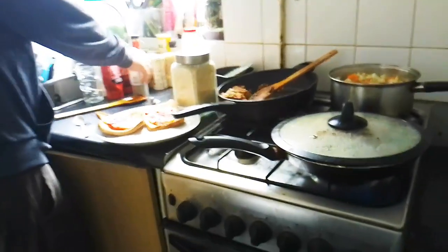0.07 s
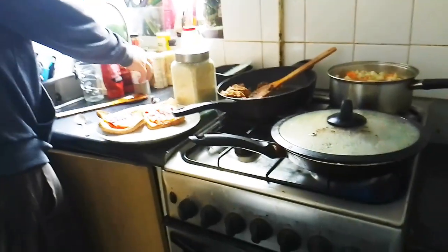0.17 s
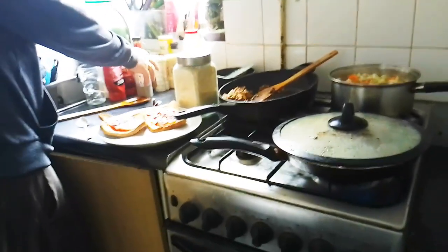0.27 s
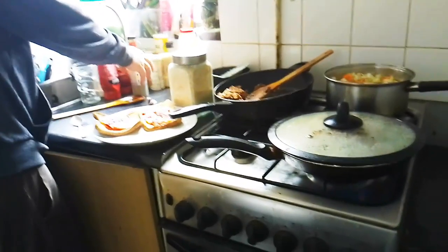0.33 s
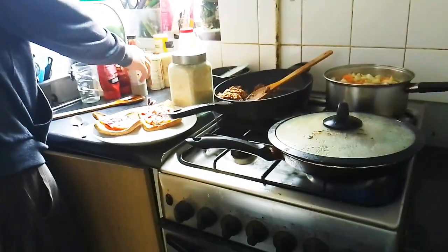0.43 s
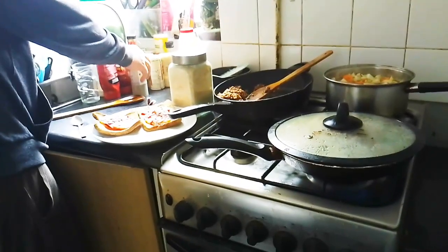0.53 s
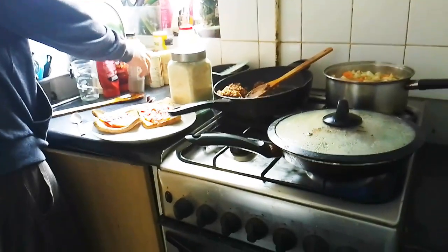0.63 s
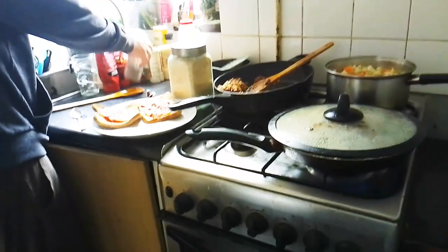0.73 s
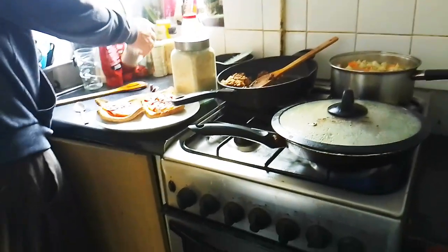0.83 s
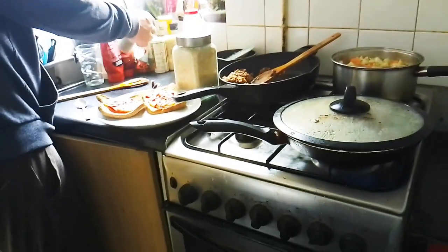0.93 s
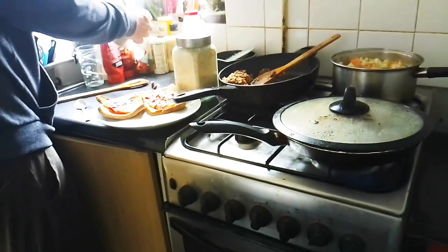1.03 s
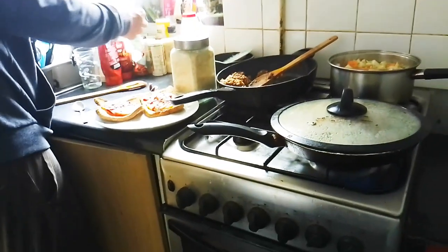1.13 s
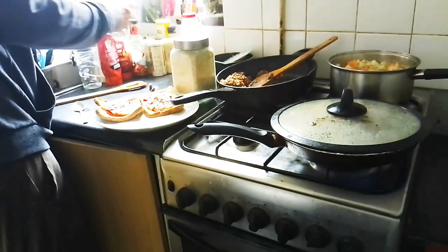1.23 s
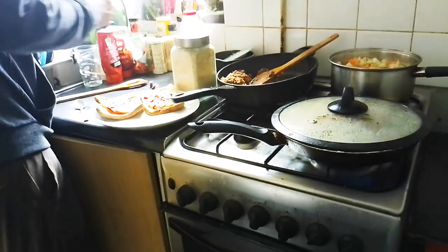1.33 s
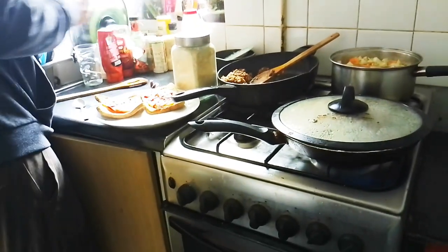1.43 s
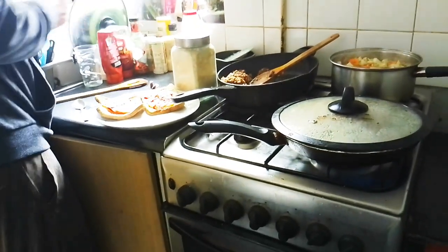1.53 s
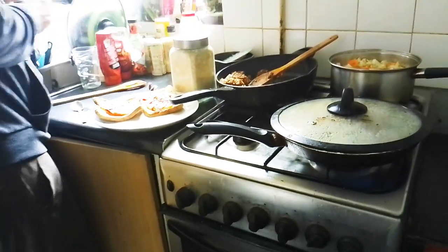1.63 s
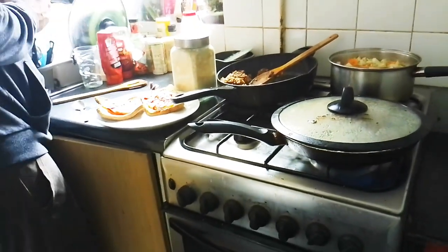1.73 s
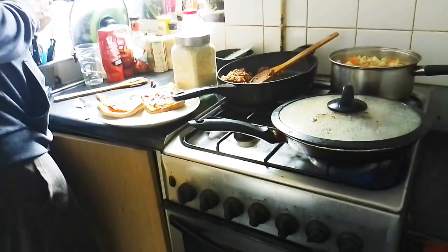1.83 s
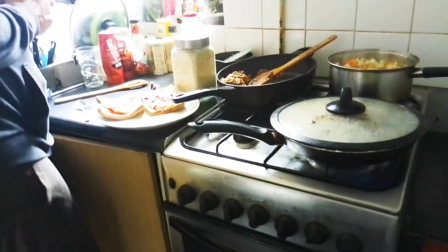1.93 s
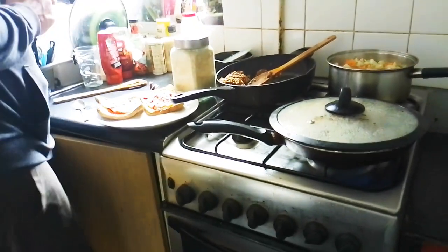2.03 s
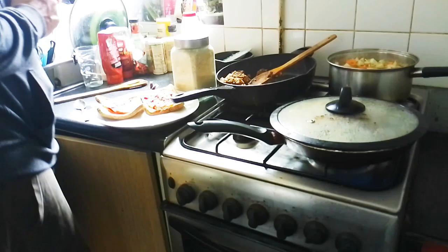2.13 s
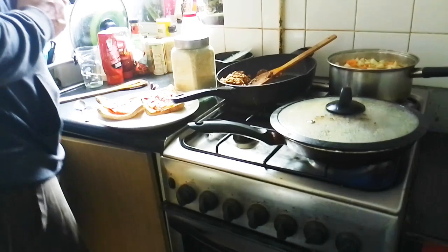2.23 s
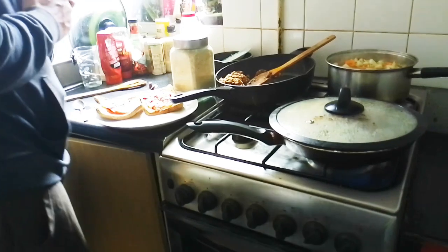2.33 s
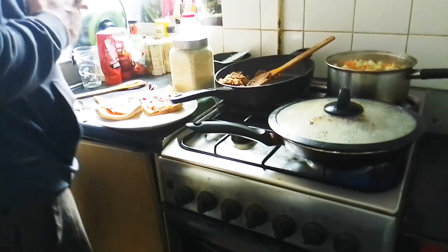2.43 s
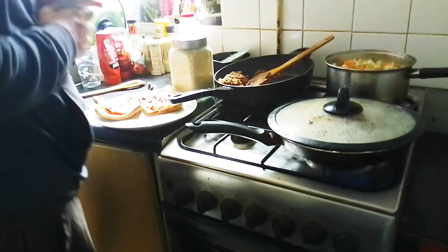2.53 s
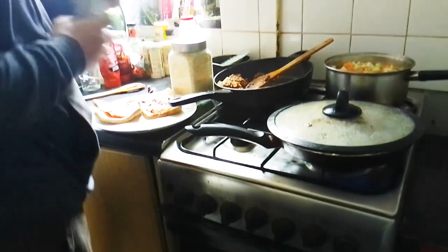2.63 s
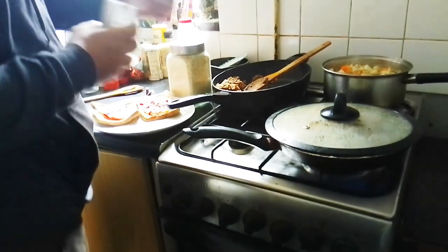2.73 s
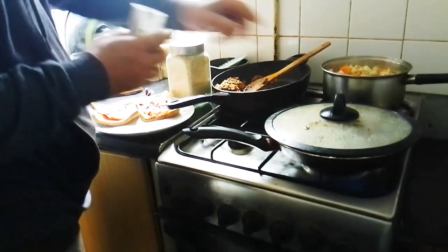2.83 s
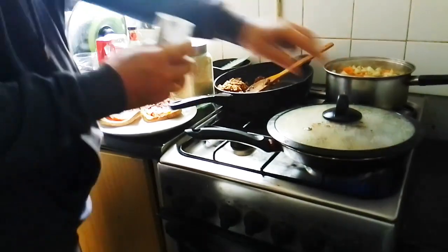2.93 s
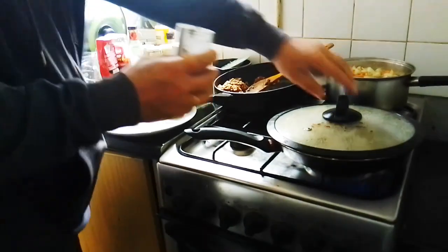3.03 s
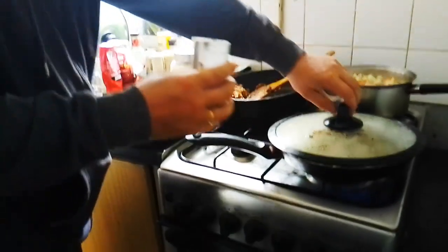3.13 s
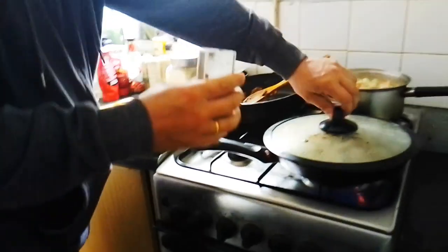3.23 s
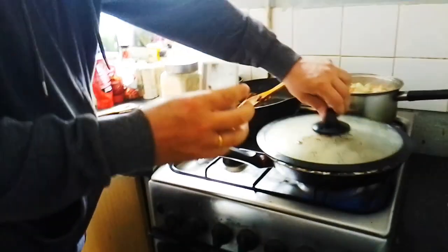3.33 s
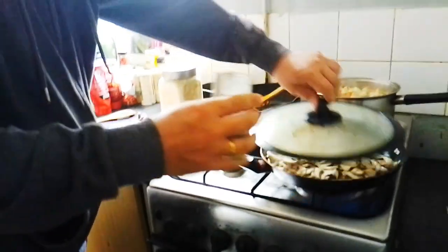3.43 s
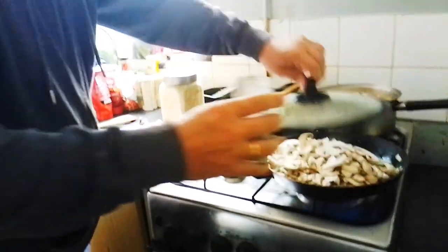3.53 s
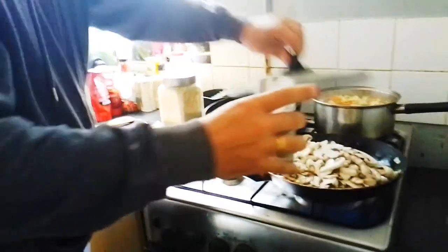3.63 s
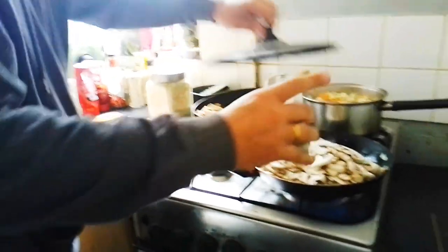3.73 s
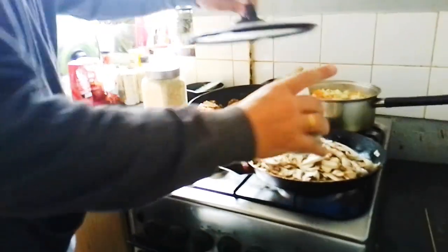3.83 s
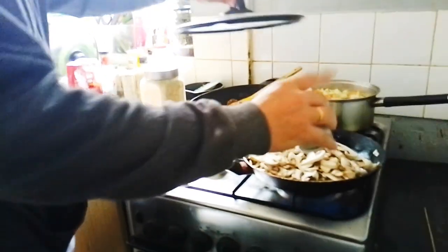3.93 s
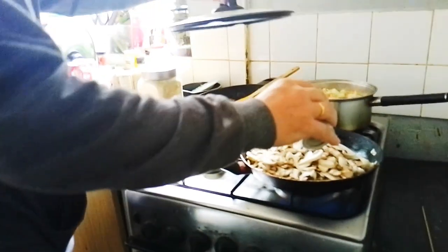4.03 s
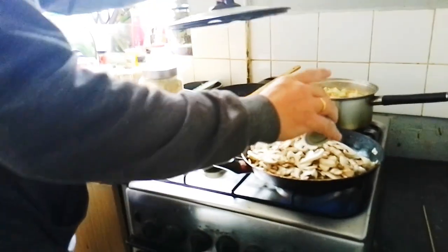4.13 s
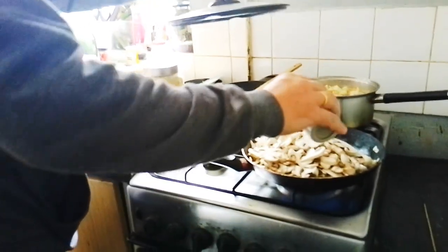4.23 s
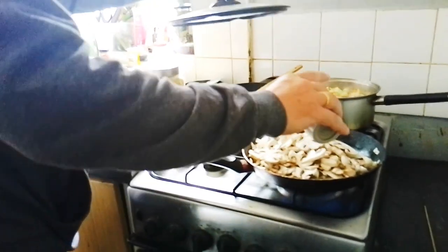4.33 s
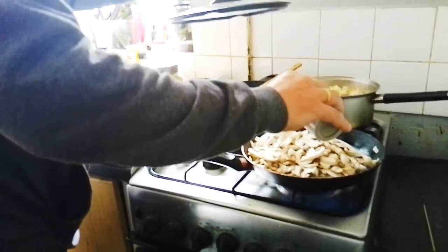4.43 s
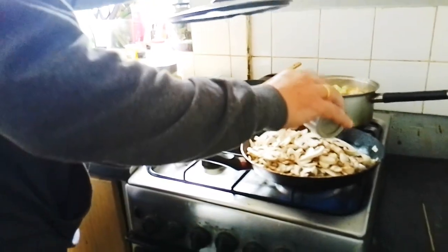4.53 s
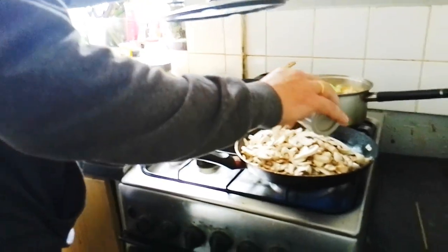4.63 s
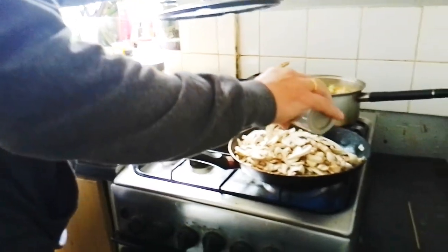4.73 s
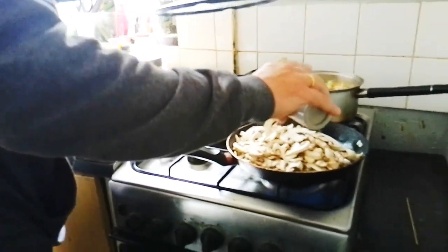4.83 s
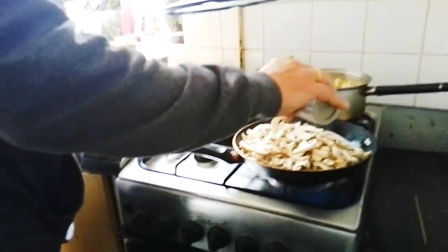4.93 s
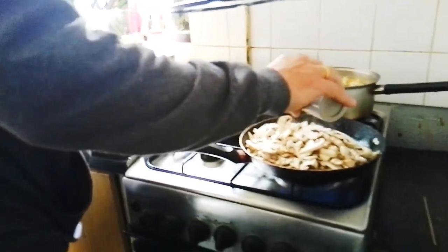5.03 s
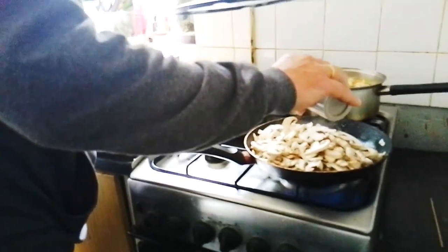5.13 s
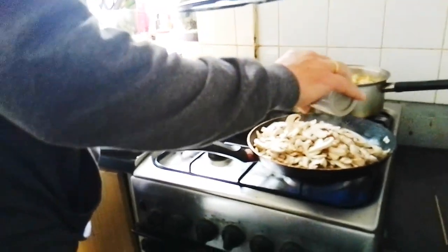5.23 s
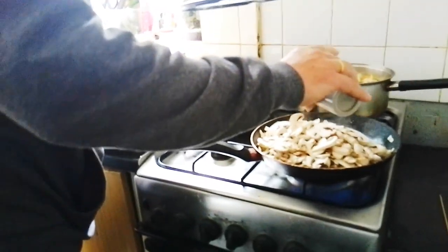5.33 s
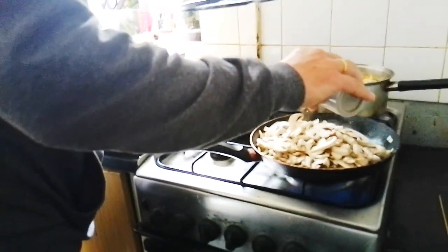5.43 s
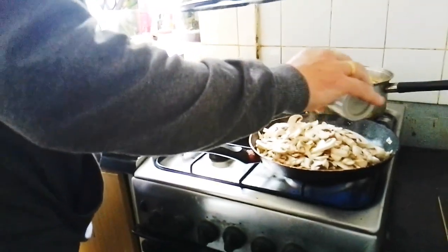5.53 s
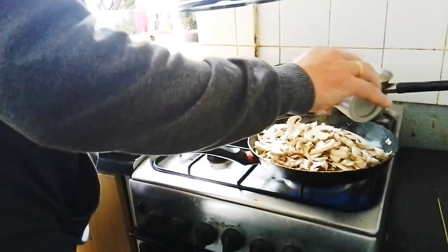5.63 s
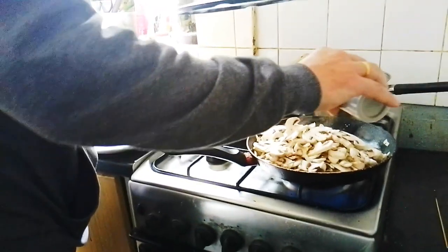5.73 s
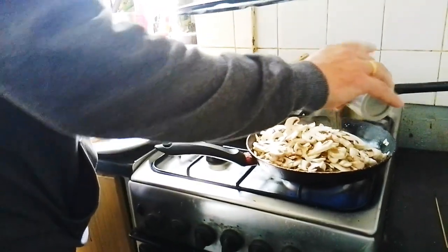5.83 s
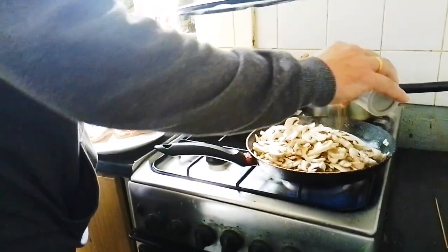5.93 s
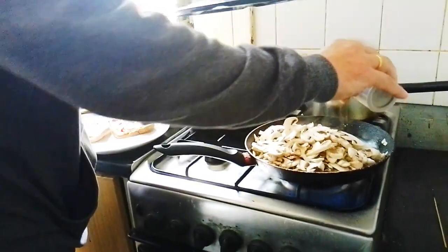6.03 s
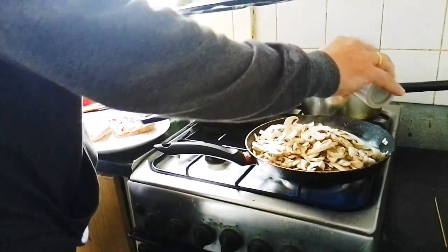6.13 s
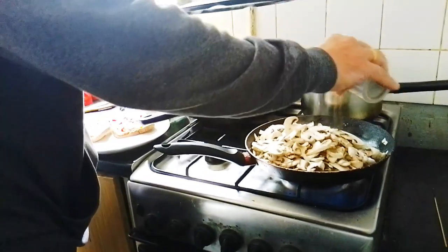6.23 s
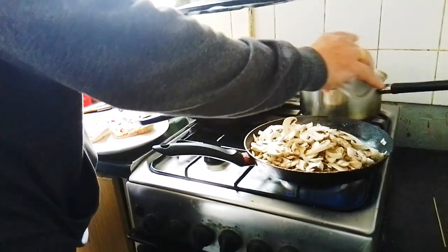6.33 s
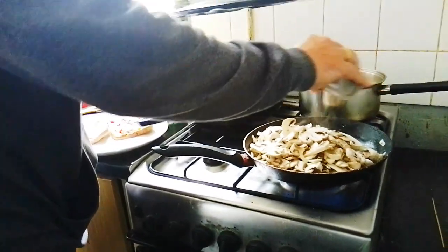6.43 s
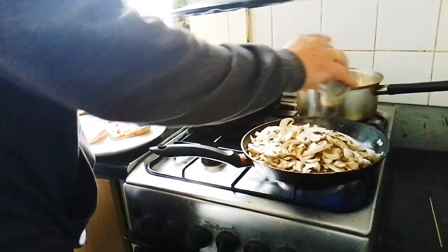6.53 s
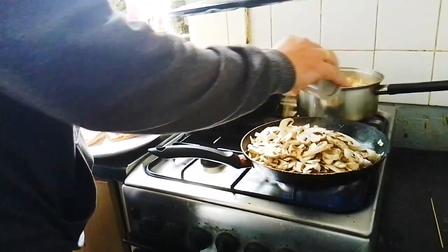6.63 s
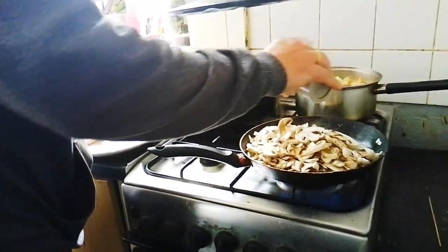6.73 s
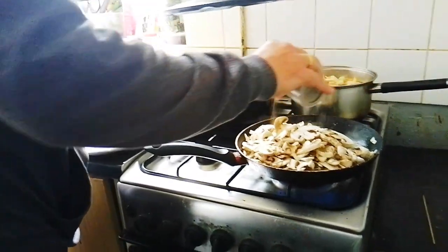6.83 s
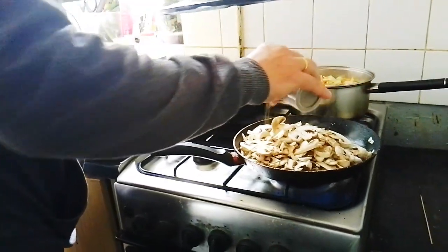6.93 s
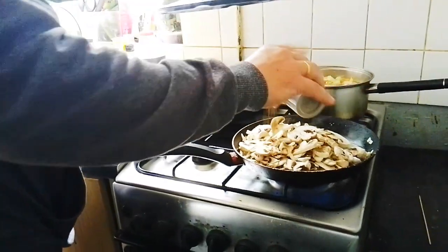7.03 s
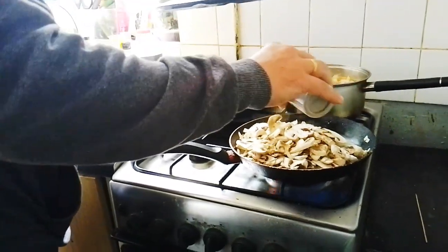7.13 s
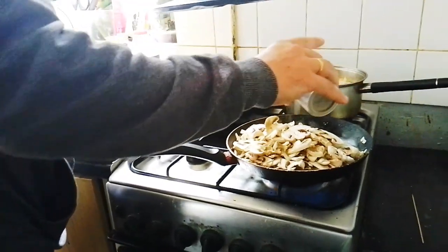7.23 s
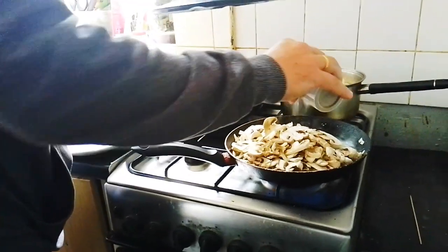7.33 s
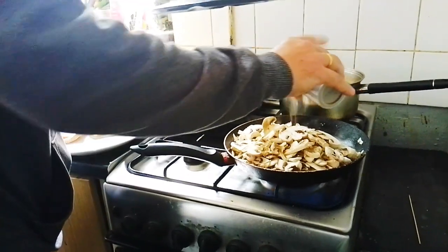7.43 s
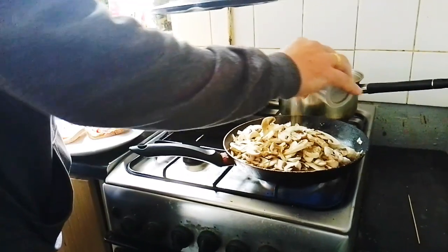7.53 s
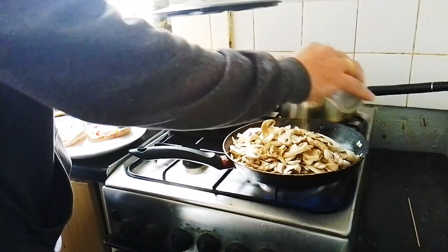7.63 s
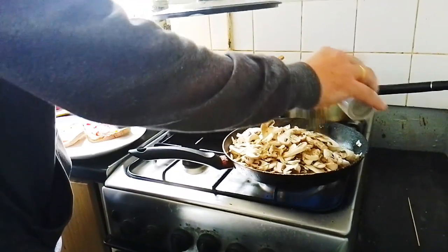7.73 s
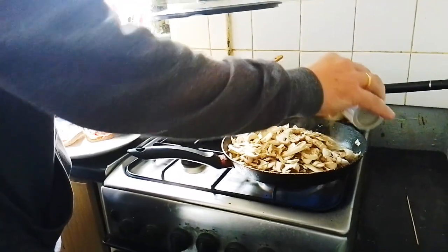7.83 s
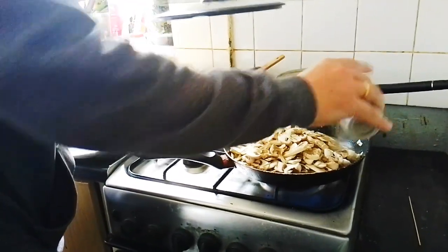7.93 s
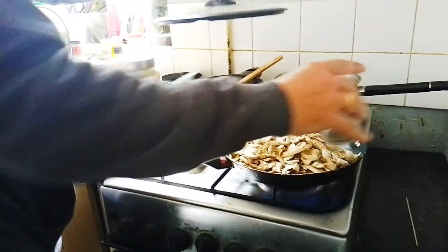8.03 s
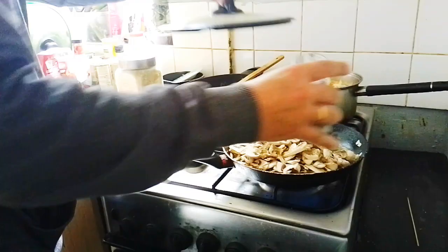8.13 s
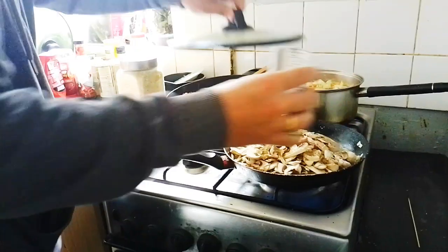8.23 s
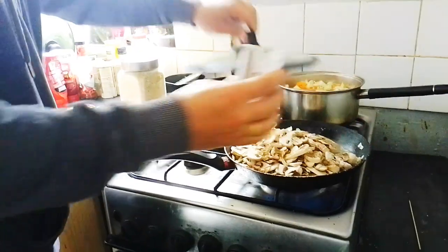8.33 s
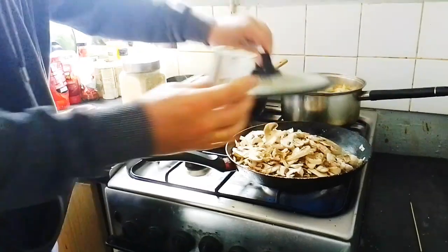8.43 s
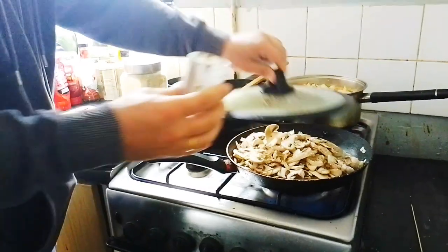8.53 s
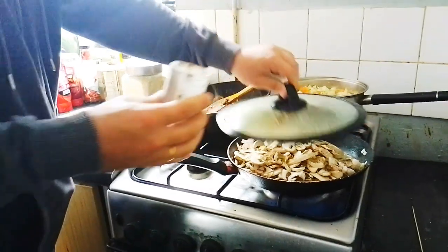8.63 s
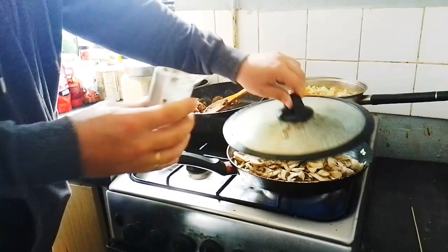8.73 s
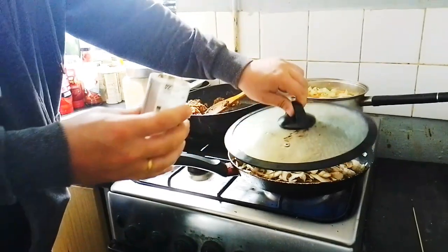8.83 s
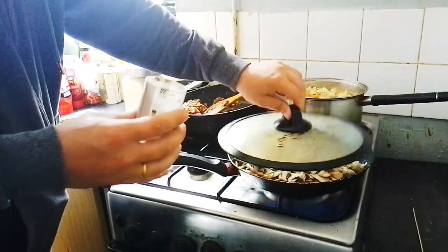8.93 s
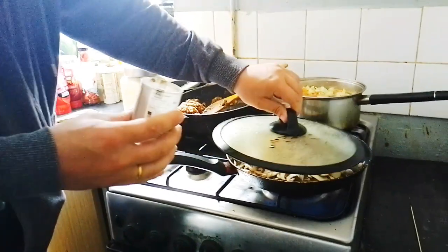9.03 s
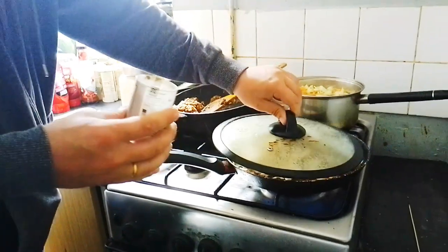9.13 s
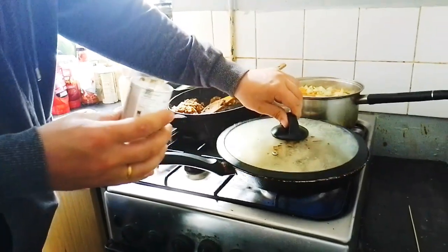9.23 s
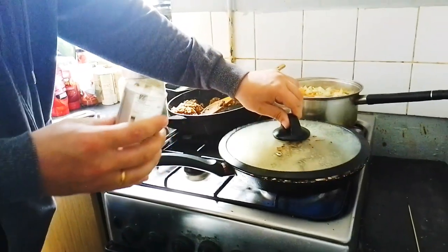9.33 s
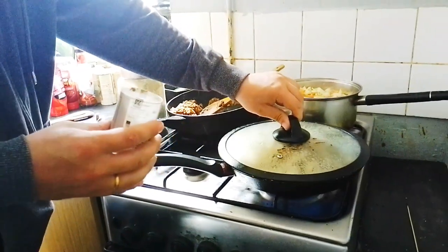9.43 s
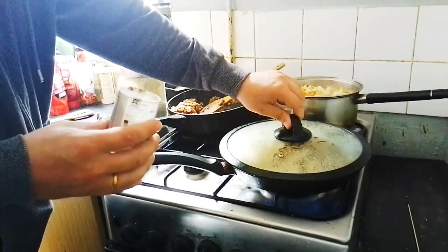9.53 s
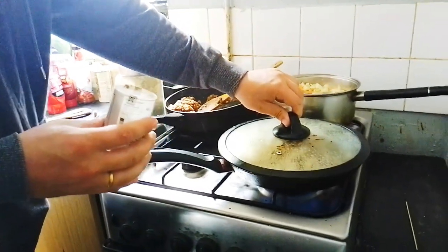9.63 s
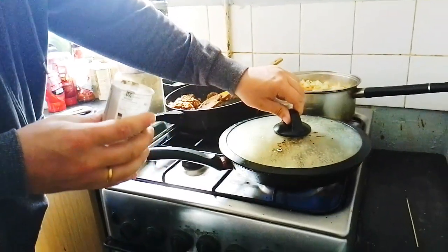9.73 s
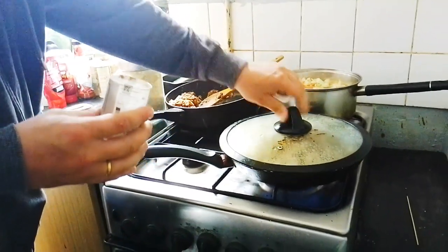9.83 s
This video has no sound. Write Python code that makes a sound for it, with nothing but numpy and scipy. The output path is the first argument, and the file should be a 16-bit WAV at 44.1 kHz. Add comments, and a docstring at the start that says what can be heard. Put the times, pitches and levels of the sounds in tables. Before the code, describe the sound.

Mono close microphone by a home gas cooker. Quiet flames and covered pans simmer; hard objects are set down with ringing clacks. Lifting a lid lets water hit hot fat, a bright, shifting, hollow hiss that soon boils off. Mushrooms sizzle and spit with sharp ticks, bubble pops and tiny steam squeals under rapid grainy shakes. The lid settles back with soft low thuds, leaving a muted fizz.

```python
"""Mushrooms fry in a pan on a gas cooker, close to one mono microphone in a small kitchen: random tiny bursts
fizz over coloured flame noise. Things are put down on the worktop as ringing double knocks. The pan's lid is
lifted and its condensation hisses fiercely through shifting resonances for a second. The open pan sizzles,
spits, pops and squeals in noise bursts and short tones; a glass of seasoning is shaken over it as clumps of
grainy noise, and the lid goes back on with a dull double bump."""
import sys
import numpy as np
from scipy import signal
from scipy.fft import rfft, irfft, next_fast_len
from scipy.io import wavfile
from scipy.ndimage import map_coordinates

SR = 44100
rng = np.random.default_rng(int(sys.argv[2]) if len(sys.argv) > 2 else 0)


def file_out(sig):
    """Save sig as 16-bit WAV at sys.argv[1]."""
    # one column per channel
    cols = np.atleast_2d(sig).T
    # limit, then scale
    lim = np.clip(cols, -1, 1)
    pcm = np.round(lim * 32767).astype(np.int16)
    wavfile.write(sys.argv[1], SR, pcm)


N = 436149


def amp(db):
    """Decibels to gain."""
    return 10 ** (np.asarray(db) / 20)


def unit(x):
    """Scale to rms 1."""
    return x / np.sqrt(np.mean(x ** 2) + 1e-20)


def crest(x):
    """Scale to peak 1."""
    return x / (np.abs(x).max() + 1e-20)


def along(points, hz):
    """(Hz, value) points read on a log frequency axis."""
    f, v = np.transpose(points)
    return np.interp(np.log(hz + 1), np.log(f + 1), v)


def wobble(rate):
    """A smooth random curve, rate knots a second."""
    knots = rng.standard_normal(int(N * rate / SR) + 4)
    return map_coordinates(knots, [np.arange(N) * rate / SR])


def swell(times):
    """A gain that rises from 0 to 1, holds and falls back, turning at four times."""
    return np.interp(np.arange(N) / SR, np.sort(times), [0, 1, 1, 0])


def filtered(x, response):
    """x times a response of frequency."""
    m = next_fast_len(len(x) + 8192)
    return irfft(rfft(x, m) * response(np.fft.rfftfreq(m, 1 / SR)), m)[:len(x)]


def coloured(x, spectrum):
    """x through a (Hz, dB) spectrum."""
    return filtered(x, lambda f: amp(along(spectrum, f)))


def band(x, hz, octaves):
    """x through a bell-shaped band whose standard deviation is given in octaves."""
    return filtered(x, lambda f: np.exp(-.5 * (np.log2((f + 1) / hz) / octaves) ** 2))


def resonate(x, modes):
    """x through (Hz, width Hz, dB) damped resonances, added with alternating signs."""
    def response(f):
        total = 0
        for k, (centre, width, db) in enumerate(modes):
            damping = 1j * f * width
            total = total + (-1) ** k * amp(db) * damping / (centre * centre - f * f + damping)
        return total
    return filtered(x, response)


def bells(x, modes):
    """x through steep-sided (Hz, width Hz, dB) resonances."""
    return filtered(x, lambda f: sum(amp(db) * np.exp(-2 * ((f - hz) / width) ** 2) for hz, width, db in modes))


def decay(t, t60):
    """An exponential that falls by 60 dB in t60 seconds."""
    return np.exp(-np.log(1000) * t / t60)


def burst(t60):
    """A quarter second that starts with dying noise."""
    t = np.arange(SR // 4) / SR
    return rng.standard_normal(len(t)) * decay(t, t60)


def add(track, s, sound):
    """Mix a sound in at time s."""
    part = track[max(round(s * SR), 0):][:len(sound)]
    part += sound[:len(part)]


def crackle(rate, spread_db):
    """Tiny bubbles bursting at random, rate a second, of log-normal sizes."""
    sizes = amp(spread_db * np.clip(rng.standard_normal(N), -3, 2.5))
    return (rng.random(N) < rate / SR) * sizes * rng.choice([-1, 1], N)


def kitchen(x, wet_db):
    """x with the answer of tiles and walls, from a fresh random tail every fifth of a second;
    each frequency dies at its own speed."""
    # reverberation of the small room: f/Hz, t60/s
    room_decay = [(150, 0.69), (500, 0.71), (1500, 0.39), (5000, 0.33), (12000, 0.5)]
    out, step = x.copy(), SR // 5
    for start in range(0, N, step):
        part = x[start:start + step]
        if np.abs(part).max() > 1e-6:  # silence needs no answer
            hz, t, z = signal.stft(rng.standard_normal(SR // 2), SR, nperseg=256)
            fading = z * decay(t, along(room_decay, hz)[:, None])
            tail = signal.istft(fading, SR, nperseg=256)[1]
            answer = signal.fftconvolve(part, tail / np.linalg.norm(tail))
            add(out, start / SR + .004, amp(wet_db) * answer)
    return out


def echoed(x):
    """x with its close reflections, whose paths shift a little as lid and arm move."""
    # reflections off pan and cooker: delay/s, gain (linear)
    reflections = [(.0012, 0.12), (.0024, 0.28), (.0039, .22)]
    now, stretch = np.arange(N), 1 + 0.022 * wobble(2.5)
    return x + sum(gain * map_coordinates(x, [now - delay * stretch * SR]) for delay, gain in reflections)


def cooker():
    """Gas flames rush steadily while the covered pans fizz and ring faintly over an electrical hum."""
    # spectrum of the gas flames: f/Hz, density/dB per Hz
    flame_spectrum = [(20, -24), (45, -16), (75, -22.5), (125, -17.5), (175, -28), (215, -15.5), (265, -12),
                      (295, -2), (410, -1.5), (495, -5.5), (570, -12), (850, -7), (1000, -10.5), (1400, -6),
                      (2400, -17), (4000, -50)]
    # spectrum of the covered pans: f/Hz, density/dB per Hz
    simmer_spectrum = [(1200, -58), (2000, -15.5), (2750, -8), (3100, -11), (4200, -8.5), (4800, -6.5),
                       (6300, -5.5), (8500, -5.5), (10500, -3.5), (12000, -4.5), (14000, -11.5),
                       (15800, -15)]
    # resonances of the covered pans: f/Hz, width/Hz, level/dB
    pan_modes = [(5440, 180, -15), (6890, 160, -6), (7920, 190, 1.5), (9110, 290, -0.5), (10310, 530, -2.5),
                 (11520, 170, -2.5), (12800, 220, -5)]
    # faint electrical hum: f/Hz, rms level/dB
    hum_tones = [(49, -91), (100, -89.5)]
    flames = unit(coloured(rng.standard_normal(N), flame_spectrum)) * amp(-61.0 + 0.79 * wobble(8.3))
    bubbles = kitchen(crackle(rate=10000, spread_db=6.5), wet_db=-6)
    ring = resonate(rng.standard_normal(N), pan_modes)
    fizz = unit(coloured(unit(bubbles) + amp(-4.5) * unit(ring), simmer_spectrum))
    hum = np.zeros(N)
    for hz, db in hum_tones:
        phase = 2 * np.pi * hz * np.arange(N) / SR + 0.58 * wobble(8.8)
        hum += amp(db) * unit(np.sin(phase))
    return flames + fizz * amp(-55.0 + 0.31 * wobble(2.87)) + hum


def worktop():
    """A thing lands on its edge, comes down flat and rebounds once; the board sounds, hard things clack and ring."""
    # things put down, levels before the room and track gains: t/s, edge level/dB, flat level/dB,
    # hard clack level/dB, edge centre f/Hz, rebound delay/s, rebound loss/dB
    knocks = [(0.008, -44, -56, -85, 365, 0.041, 1), (0.214, -45, -49, -80, 330, 0.021, 10),
              (0.466, -30.5, -29, -70, 1230, 0.037, 7), (1.901, -39, -49, -58, 1330, 0.025, 1.5),
              (2.139, -39.5, -37.5, -27, 1010, 0.011, 0)]
    # resonances of the board: f/Hz, width/Hz, level/dB
    board_modes = [(239, 62, -13), (372, 75, 5), (437, 79, 2), (720, 190, -6), (893, 70, -1),
                   (1100, 120, 0), (1320, 230, -3.5), (1610, 330, -9)]
    # spectrum of a hard clack: f/Hz, density/dB per Hz
    clack_spectrum = [(590, -36), (1000, -20), (1410, -4), (1950, -15), (2300, -8), (2830, -24),
                      (3290, -13), (6270, -8), (6720, -12), (10700, 1.5), (15800, -31)]
    # ring of the hard thing itself: f/Hz, width/Hz, level/dB
    hard_modes = [(401, 30, -0.5), (444, 35, 4.5), (742, 12, 7), (803, 11, 0), (921, 21, 2), (1340, 11, -1),
                  (1448, 9.9, -2)]
    flat_after_s, flat_hz = 0.00591, 460  # the base follows the edge with a duller knock
    clack_loss_db = 12  # lost from the clack by the rebound
    snap_db, ring_db, boom_db = -1, -7, -35  # relative to the clack, before the track gains
    board, clack, snap = np.zeros(N), np.zeros(N), np.zeros(N)
    for s, edge_db, flat_db, clack_db, edge_hz, rebound, loss_db in knocks:
        contacts = [(0, edge_db, edge_hz), (flat_after_s, flat_db, flat_hz), (rebound, edge_db - loss_db, edge_hz)]
        for delay, db, hz in contacts:
            push = amp(-35) * burst(t60=0.054)  # faint dying noise around one sharp push
            push[round(.001 * SR)] += 1
            add(board, s + delay, amp(db) * crest(band(resonate(push, board_modes), hz, octaves=0.82)))
        for delay, db in [(0, clack_db), (rebound, clack_db - clack_loss_db)]:
            add(clack, s + delay, amp(db) * crest(coloured(burst(t60=0.03), clack_spectrum)))
        # the dry snap of first contact, the hard thing's ring and the cupboard's boom
        add(snap, s + 0.0012, amp(clack_db + snap_db) * crest(band(burst(t60=0.008), 9500, octaves=1.0)))
        hard_ring = resonate(signal.unit_impulse(SR // 4), hard_modes)
        add(board, s, amp(clack_db + ring_db) * crest(hard_ring))
        add(board, s, amp(clack_db + boom_db) * crest(band(burst(t60=0.18), 45, octaves=0.98)))
    return amp(0.5) * kitchen(board, wet_db=-0.5) + kitchen(clack, wet_db=7.5) + snap


def spits():
    """Sharp high ticks, from spitting fat or seasoning grains, each with a short spray that swells and dies."""
    # sharp high ticks: spits of fat, and grains of seasoning at the shaker's strokes:
    # t/s, peak level before the room/dB, centre f/Hz, spray relative to tick/dB
    sharp_ticks = [(0.197, -37, 8250, -9), (0.791, -38, 8250, -12), (1.691, -30, 7900, -14),
                   (2.9204, -34, 11800, -16), (3.5838, -27, 9900, -12), (3.636, -23.5, 11300, -14),
                   (3.803, -26, 9800, -9), (3.8442, -26, 10100, -14), (3.9644, -28, 10200, -4),
                   (4.0538, -17, 9800, -18), (4.2436, -24, 9600, -20), (4.2794, -24, 10200, -24),
                   (4.4138, -17, 9400, -21), (4.435, -25, 10200, -16), (4.469, -20, 9500, -17),
                   (4.6426, -24.5, 9200, -7), (4.7525, -32, 10100, -2), (5.1489, -30, 10100, 0),
                   (5.199, -32, 10000, -24), (5.388, -28, 10100, -22), (5.4497, -31, 10900, -22),
                   (5.5799, -26, 10800, -12), (5.5952, -25, 10500, -12), (5.9227, -29, 10300, -15),
                   (6.19, -33, 6000, -16), (6.366, -31, 6760, -24), (6.425, -25, 10000, -22),
                   (6.502, -34, 7500, -24), (7.2217, -28, 10200, -20), (7.45, -25, 10000, -9.5),
                   (7.7071, -31, 9500, -20), (7.7984, -38, 9500, -20), (7.8857, -28, 10100, -18),
                   (8.1775, -30, 9200, -18), (8.5652, -34, 10200, -24), (8.634, -26, 10100, -17),
                   (8.7852, -31, 10800, -17), (8.929, -33, 5900, -26)]
    out, t = np.zeros(N), np.arange(SR // 4) / SR
    for s, db, hz, spray_db in sharp_ticks:
        spray = burst(t60=0.08) * (1 - np.exp(-t / 0.00089))
        tick = burst(t60=0.0054)
        add(out, s, amp(db) * crest(band(tick + amp(spray_db) * spray, hz, octaves=0.23)))
    return kitchen(out, wet_db=-10)


def rubs():
    """Soft swells of friction, fizz and moving air: noise bands under bell-shaped envelopes."""
    # rubs, fizzes and puffs: centre t/s, envelope deviation/s, centre f/Hz, width/octaves,
    # rms level at the envelope's top, before the room/dB
    brushes = [(0.69, 0.17, 8050, 0.25, -58.5), (1.36, 0.045, 4900, 0.23, -63),
               (2.56, 0.038, 10300, 0.76, -48), (6.06, .035, 70, 0.3, -73), (6.295, 0.02, 634, 0.16, -60.5),
               (7.182, 0.017, 660, 0.16, -60.5), (6.916, 0.019, 5450, 0.44, -45),
               (8.386, 0.053, 47.7, .6, -68), (8.799, 0.087, 67.2, .22, -68)]
    out, t = np.zeros(N), np.arange(N) / SR
    for s, length, hz, octaves, db in brushes:
        envelope = np.exp(-.5 * ((t - s) / length) ** 2)
        out += amp(db) * envelope * unit(band(rng.standard_normal(N), hz, octaves))
    return kitchen(out, wet_db=-4.5)


def pops():
    """A click, a brief sagging ring and a splutter sound the room together, mostly as a large bubble cracks open."""
    # large bubbles, and one broad click at 1.691 s: t/s, peak level before the room and final gain/dB,
    # starting pitch f/Hz, ring relative to click/dB, ring t60/s, splutter relative to click/dB
    clicks_and_bubbles = [(1.691, -42.5, 2310, -5, 0.027, -14), (1.77, -45, 6300, -4, .01, -10),
                          (2.361, -50, 4610, -3, .03, -10), (2.995, -50, 4700, 0, 0.019, -5),
                          (3.437, -45.5, 4430, -3, .02, -1), (3.674, -30, 3560, -4, .02, -2),
                          (3.858, -34.5, 4280, -5, 0.088, 1), (4.142, -28, 3130, -17, .02, -1.5),
                          (4.453, -35.5, 4730, -15, .01, -3), (4.729, -38, 3440, -5.5, .1, -3.5),
                          (4.921, -38.5, 4400, -16, .02, -12), (5.497, -41.5, 4530, -3, .02, -10),
                          (5.768, -40.5, 3990, 0, .03, -16), (6.214, -37, 3900, -12, .02, -9),
                          (6.325, -35.5, 5320, -9, 0.13, -3), (6.435, -36, 3650, -12, .02, -22),
                          (6.699, -31, 3870, -14, 0.04, -9), (6.706, -37, 5700, -8, .02, -1),
                          (7.964, -32, 6100, -14, .01, -4), (8.015, -40, 5300, -6, .02, -8),
                          (8.053, -27.5, 5600, -5, 0.04, -1), (8.125, -38.5, 4670, -4, .03, -4),
                          (8.258, -27.5, 3450, -16, .17, -10), (8.634, -35, 4000, -2, 0.014, -22),
                          (8.81, -42, 4800, -12, 0.0098, -10), (9.055, -32.5, 4646, -6.5, 0.07, -12),
                          (9.182, -34.5, 4200, -10, .01, -18), (9.189, -38, 4480, -1, 0.036, -1)]
    sag_per_s = 0.39  # share of its starting pitch that the ring loses in a second
    out, t = np.zeros(N), np.arange(SR // 4) / SR
    for s, db, hz, ring_db, t60, splutter_db in clicks_and_bubbles:
        tone = np.sin(2 * np.pi * hz * t * (1 - sag_per_s * t / 2))
        ring = tone * decay(t, t60) * (1 - np.exp(-t / 0.0014))
        click = crest(band(burst(t60=0.0049), hz, octaves=0.38))
        splutter = crest(band(burst(t60=0.1), hz, octaves=0.19))
        add(out, s, amp(db) * crest(click + amp(ring_db) * crest(ring) + amp(splutter_db) * splutter))
    return amp(1.0) * kitchen(out, wet_db=-3.0)


def open_pan():
    """Countless small bubbles burst in the fat under the mushrooms, some ticking sharply; the lid shuts them in."""
    # the lid is off: starts to lift t/s, clear t/s, starts to lower t/s, shut t/s
    lid_times = (3.35, 3.8, 8.601, 9.6)
    # spectrum of the open pan: f/Hz, density/dB per Hz
    sizzle_spectrum = [(350, -47), (520, -30), (630, -9), (800, -10.5), (980, -11.5), (1320, -4.5),
                       (1970, -10), (2520, -8.5), (3270, -10.5), (4370, -6.5), (7450, -5), (10100, 1.5),
                       (14500, -12), (15800, -13.5)]
    bubbles = crackle(rate=12000, spread_db=7.0) * amp(1.5 * wobble(25))
    bed = unit(coloured(kitchen(bubbles, wet_db=-1.5), sizzle_spectrum))
    ticks = unit(band(crackle(rate=450, spread_db=6.5), 9000, octaves=0.39))
    return amp(-47.5) * swell(lid_times) * (bed + amp(-10) * ticks)


def flash():
    """Water from the lid boils off in spurts and spreads, so the hiss shifts among resonances and sounds hollow."""
    # condensation off the tilted lid: first drops t/s, full flow t/s, slackens t/s, boiled off t/s
    flow_times = (3.43, 3.8, 4.48, 4.7)
    # resonances the hiss excites as the water spreads: f/Hz, width/Hz, early level/dB, late level/dB
    hiss_modes = [(5450, 230, -16, -11), (5990, 200, -7, -12), (6300, 270, -6, -12), (6800, 150, -1.5, -9),
                  (7100, 130, -2, -14), (7570, 140, -3, -13), (8000, 190, -17, -1), (8480, 380, -6, 0),
                  (9590, 260, -2, 0.5), (10040, 320, 0.5, 0.5), (10650, 280, -1, -2), (10900, 120, -7, -5),
                  (11400, 280, -4, -3), (12070, 450, -7, -7), (12400, 150, -11, -9), (12900, 150, -11, -10),
                  (13200, 180, -14, -11)]
    # spectrum of the plain rush of steam: f/Hz, density/dB per Hz
    steam_spectrum = [(2710, -50), (4600, -28), (5300, -17), (6200, -13), (7400, -13), (9100, -8),
                      (10000, 3), (11800, -3), (13200, -10), (14000, -13), (15800, -16)]
    # hollow resonances around the boiling water: f/Hz, width/Hz, level/dB
    hollow_modes = [(1370, 91, 2.5), (1830, 86, 3), (2614, 154, 3), (3070, 150, -2), (3580, 270, -3),
                    (4440, 110, -5)]
    hiss_db, boil_db = -37, -50.5  # rms at full flow
    steam_db = -9  # the plain rush under its resonances
    boil_grows = 1.2  # boiling goes as this power of the flow
    flow = swell(flow_times)
    spray = crackle(rate=3700, spread_db=4.5) * amp(2.5 * wobble(110) + 0.5 * wobble(14))
    spray = kitchen(echoed(spray), wet_db=-2.5)
    spread = np.interp(np.arange(N) / SR, flow_times[1:3], [0, 1]) + 0.2 * wobble(9)
    early = bells(spray, [(hz, width, db) for hz, width, db, _ in hiss_modes])
    late = bells(spray, [(hz, width, db) for hz, width, _, db in hiss_modes])
    ringing = unit(early + np.clip(spread, 0, 1) * (late - early))
    steam = unit(coloured(spray, steam_spectrum))
    hiss = amp(hiss_db) * flow * unit(ringing + amp(steam_db) * steam)
    boiling = resonate(kitchen(crackle(rate=4000, spread_db=6.0), wet_db=-6.5), hollow_modes)
    return hiss + amp(boil_db) * flow ** boil_grows * unit(band(boiling, 2750, octaves=0.76))


def shaker():
    """On each stroke the seasoning thumps against the end of the glass and grains scatter in two quick clumps."""
    # strokes of the glass: t/s, grain level relative to grains_db/dB
    strokes = [(4.279, -1), (4.474, 4), (4.642, -7), (4.812, 1), (4.978, -0.5), (5.149, -10), (5.312, 1.5),
               (5.479, -2.5), (5.64, -2), (5.805, -0.5), (5.981, -6), (6.31, -5), (6.479, -6), (6.652, 0),
               (6.826, -1), (6.991, 1), (7.175, -6), (7.35, -2.5), (7.534, 2), (7.707, -7), (7.886, -5)]
    grains_db, thump_db = -32.5, -52  # peaks before the room
    clumps = [(0, 0), (.008, -3)]  # delay/s, level/dB: the slower grains land just behind the first
    out, t = np.zeros(N), np.arange(SR // 4) / SR
    for s, db in strokes:
        add(out, s, amp(thump_db) * crest(band(burst(t60=0.11), 367, octaves=0.57)))
        for delay, clump_db in clumps:
            grains = burst(t60=0.036) * (1 - np.exp(-t / 0.00088))
            add(out, s + delay, amp(grains_db + db + clump_db) * crest(band(grains, 8000, octaves=0.67)))
    return kitchen(out, wet_db=-15)


def squeals():
    """Steam escaping from under the mushrooms sings a brief, rough note that glides as its gap changes."""
    # squeals: t/s, length/s, first f/Hz, last f/Hz, level before the arch and the room/dB
    steam_notes = [(5.17, .11, 9940, 7800, -52), (5.307, 0.14, 5230, 5130, -54.5),
                   (6.247, 0.076, 4400, 4720, -55.5), (6.86, 0.096, 6650, 6000, -50),
                   (6.938, .1, 4920, 4680, -52), (9.083, .05, 5300, 5700, -55)]
    unsteadiness_hz = 700  # random knots a second in each quadrature part
    out = np.zeros(N)
    for s, length, first_hz, last_hz, db in steam_notes:
        u = np.linspace(0, 1, round(length * SR))
        knots = rng.standard_normal((2, SR // 10))
        a, b = (map_coordinates(row, [u * length * unsteadiness_hz]) for row in knots)
        phase = 2 * np.pi * np.cumsum(first_hz + (last_hz - first_hz) * u) / SR
        rough_note = unit(a * np.sin(phase) + b * np.cos(phase))
        add(out, s, amp(db) * np.sin(np.pi * u) * rough_note)
    return kitchen(out, wet_db=-8)


def lid():
    """The lid lands softly, rocks and settles: its low modes ring and the cooker booms faintly."""
    # the soft rim meets the pan: t/s, peak level before the room and track gains/dB
    bumps = [(8.687, -49.5), (8.742, -53), (9.446, -36), (9.485, -40), (9.499, -30.5), (9.548, -46),
             (9.57, -45)]
    # low modes of the lid: f/Hz, width/Hz, level/dB
    lid_modes = [(316, 47, 16), (387, 94, -2)]
    blows, booms = np.zeros(N), np.zeros(N)
    push = np.zeros(SR // 4)
    push[round(.006 * SR)] = 1  # leaves room for the band filter, which also sounds ahead of the push
    ring = crest(band(resonate(push, lid_modes), 355, octaves=0.52))
    for s, db in bumps:
        add(blows, s - .004, amp(db) * ring)
        add(booms, s + 0.0087, amp(db) * crest(band(burst(t60=0.64), 106, octaves=0.6)))
    return amp(-1.0) * kitchen(blows, wet_db=-6.5) + amp(-24.5) * booms


def scene():
    """Everything reaches one microphone, alike on both channels."""
    mono = cooker() + worktop() + spits() + rubs() + pops()
    mono += open_pan() + flash() + shaker() + squeals() + lid()
    return np.array([mono, mono])


def record(dry):
    """The recorder keeps nothing above its band limit."""
    top_hz = 15800
    return np.array([filtered(channel, lambda f: f < top_hz) for channel in dry])


dry = scene()
out = record(dry)
file_out(out)
```